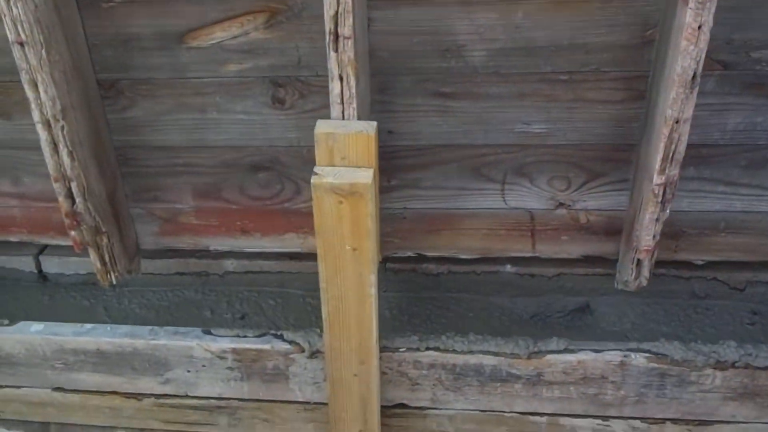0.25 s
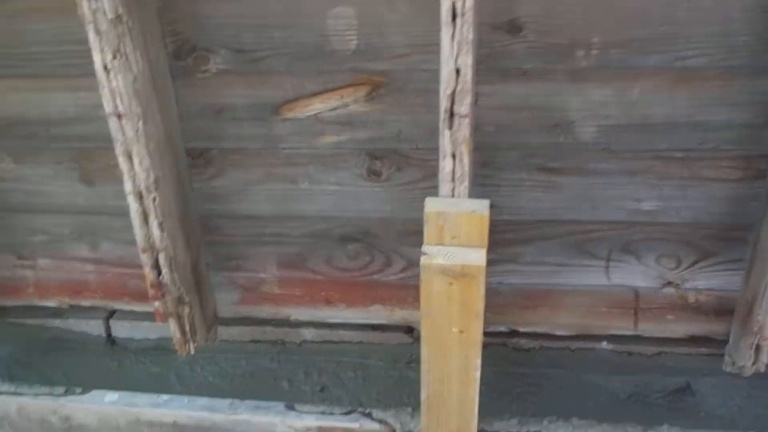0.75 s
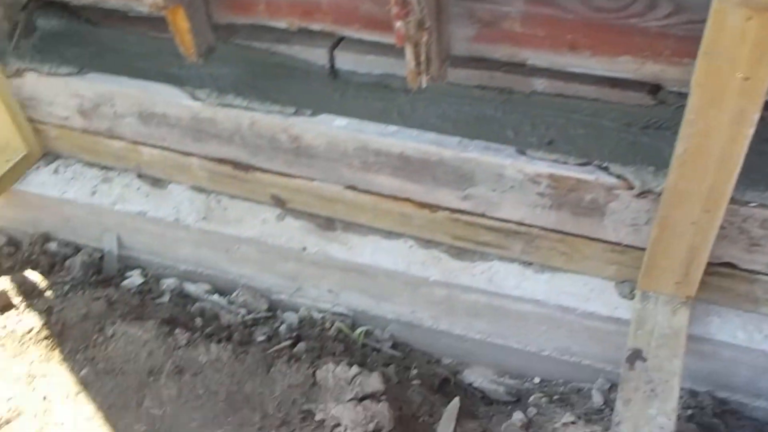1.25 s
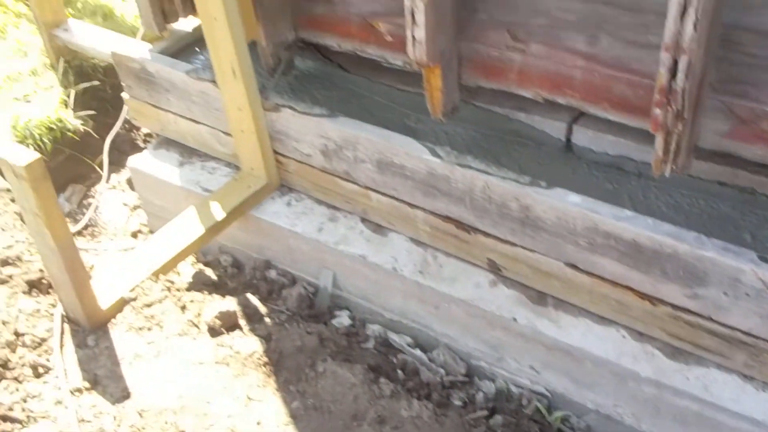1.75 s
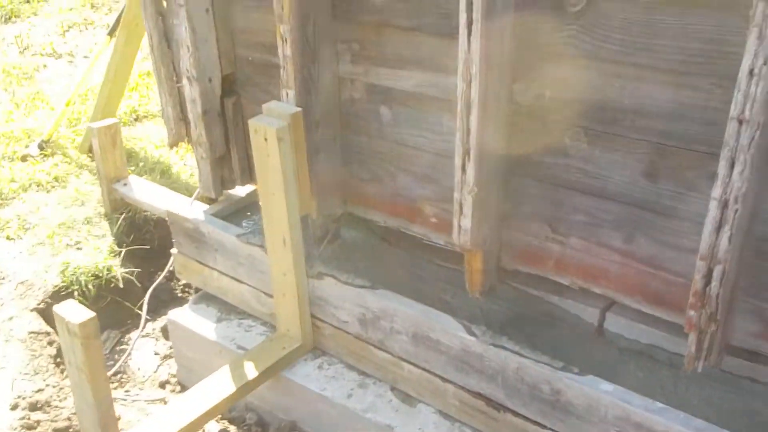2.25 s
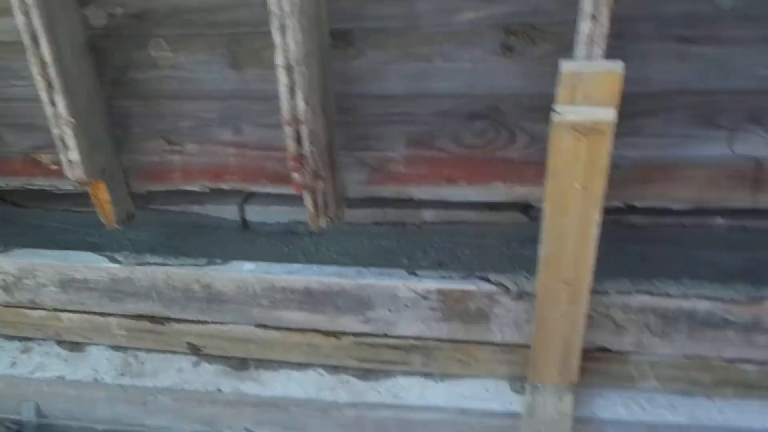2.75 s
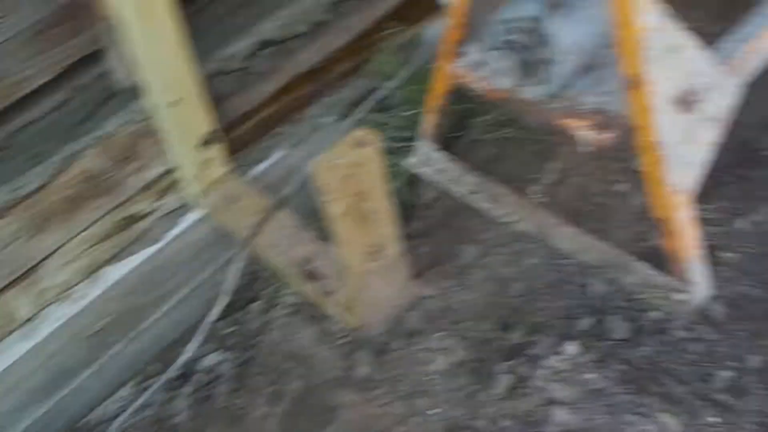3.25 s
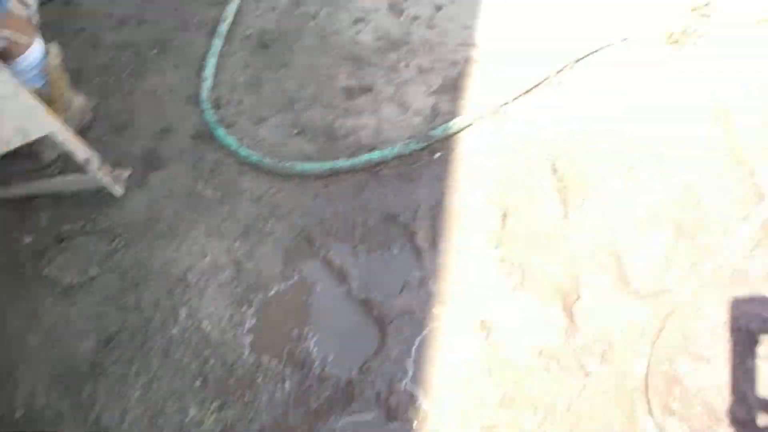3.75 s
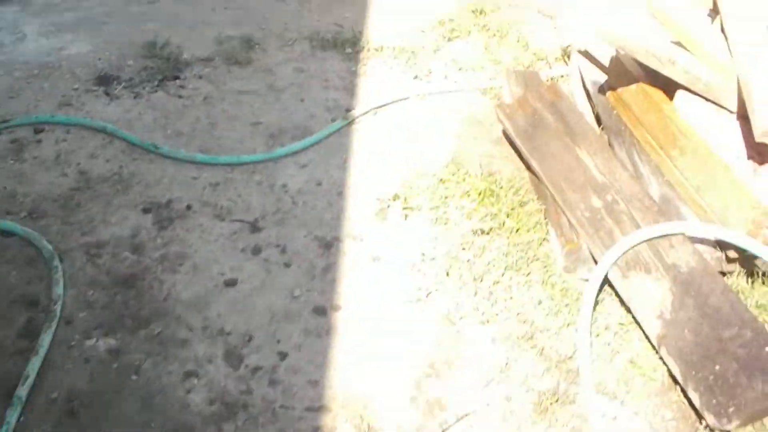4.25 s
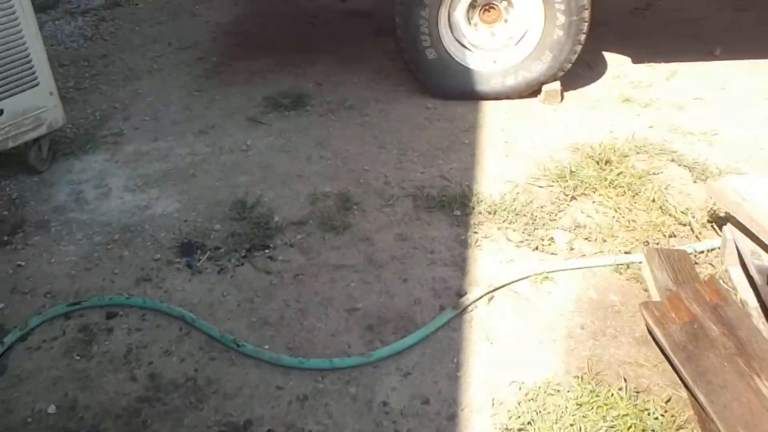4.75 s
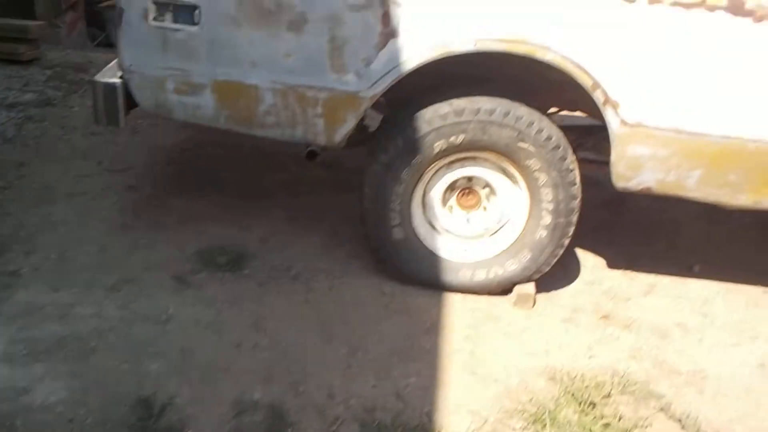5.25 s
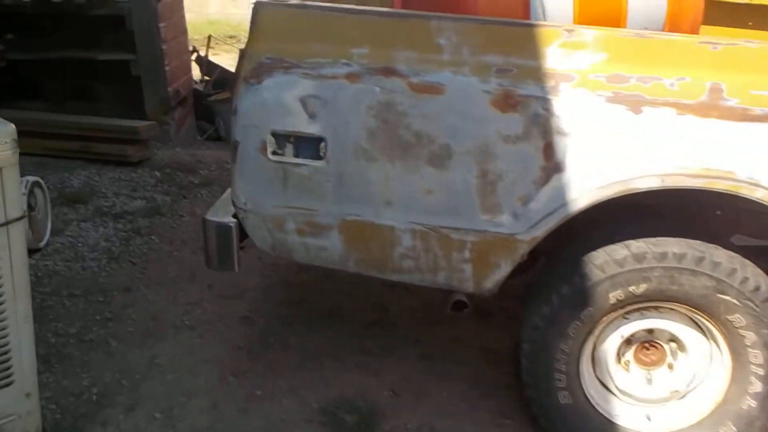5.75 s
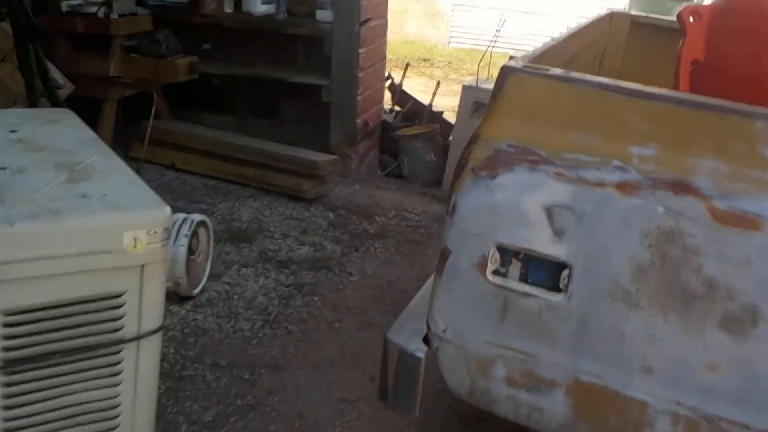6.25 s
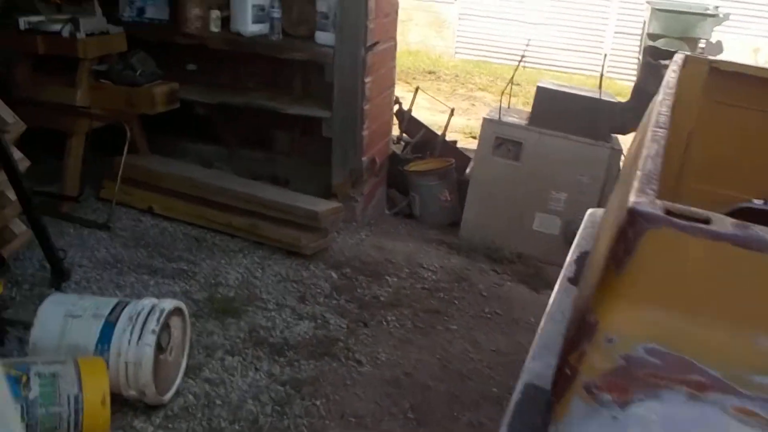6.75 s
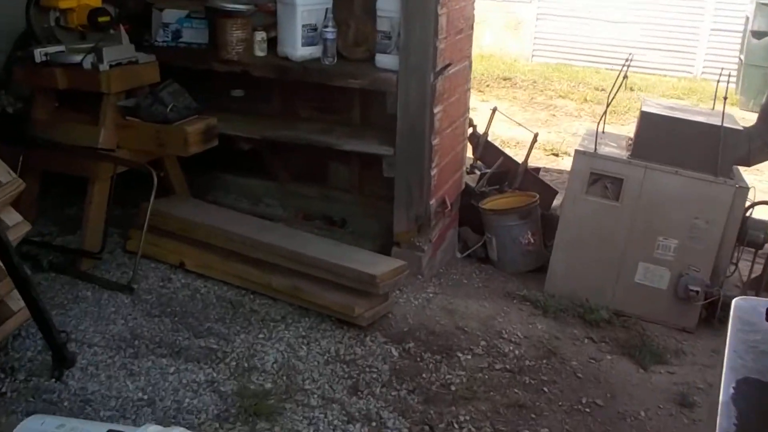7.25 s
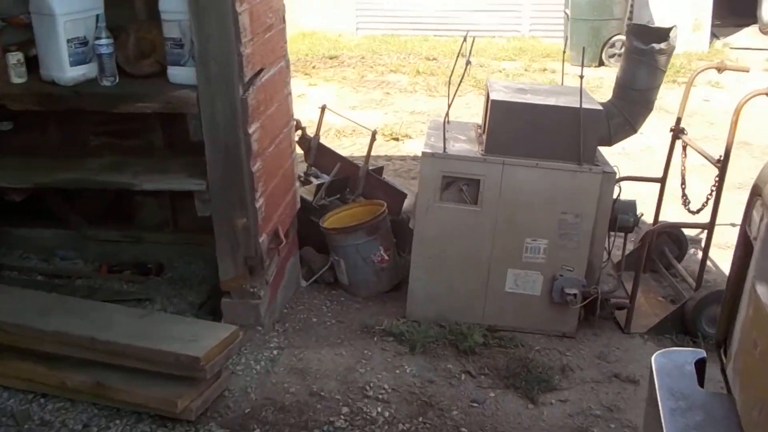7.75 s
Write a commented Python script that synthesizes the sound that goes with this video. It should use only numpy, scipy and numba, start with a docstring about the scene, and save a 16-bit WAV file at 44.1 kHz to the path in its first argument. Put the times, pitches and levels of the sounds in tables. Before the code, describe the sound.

Gritty churning and steel drum clatter pulse with fast gear teeth, wind puffs buffet the microphone, then the noise drops to gravel crunches and chirping.

```python
"""Beside a shed a small concrete mixer turns, heard by a hand-held camera that swings round and walks off.
Twice the lifted load crashes through the steel drum: noise and clicks, pulsed by gear teeth, ring its modes.
Bright noise makes the sliding mix, stones and scrapes; low noise on each port makes wind rumble and puffs.
Towards the end come small hollow knocks, gravel crunches of banded noise, a faint electrical hum and a bird
close by, whose chirps are drooping sines. A dull echo and hiss lie under it all."""
import sys
import numpy as np
from scipy import signal
from scipy.fft import rfft, irfft, next_fast_len
from scipy.io import wavfile
from scipy.ndimage import uniform_filter1d, map_coordinates
from numba import njit

SR = 44100
rng = np.random.default_rng(int(sys.argv[2]) if len(sys.argv) > 2 else 0)


def persist_wave(psi):
    """Save psi, clipped to +-1, as 16-bit WAV."""
    counts = np.round(np.clip(psi, -1, 1) * 32767).astype(np.int16)
    wavfile.write(sys.argv[1], SR, np.atleast_2d(counts).T)


N = 352800
TIME = np.arange(N) / SR
SIZE = next_fast_len(N + 8192)

# what struck steel at the gear rings with: (frequency [Hz], width [Hz], level in the clank [dB])
GEAR_MODES = [(980, 25, 4), (1796, 350, 17.5)]


def undb(db):
    """Amplitude of a level in dB."""
    return 10 ** (np.asarray(db) / 20)


def curve(table):
    """Columns of a table as signals, interpolated over its times."""
    s, *columns = np.transpose(table)
    return [np.interp(TIME, s, c) for c in columns]


def camera_response(size=SIZE):
    """Causal response of the microphones in their housing, from the cepstrum of the log gain."""
    # broad tone of the camera: (frequency [Hz], gain [dB])
    tone_curve = [(40, -66), (330, -13.5), (1030, -6), (1890, -8), (2180, -15.5), (2410, -27),
                  (2720, -31.5), (5360, -25), (7000, -26), (8090, -52), (11400, -42.5), (13100, -68)]
    # dips cut by the housing: (frequency [Hz], width [Hz], depth [dB])
    housing_dips = [(2412, 115, -17), (3035, 115, -15.5), (8090, 640, -14)]
    hz = np.maximum(np.fft.rfftfreq(8192, 1 / SR), 1)
    curve_hz, curve_db = np.array(tone_curve).T
    db = np.interp(np.log(hz), np.log(curve_hz), curve_db)
    db = db + sum(d * np.exp(-((hz - f) / w) ** 2) for f, w, d in housing_dips)
    cep = irfft(np.log(undb(np.maximum(db, -110))))
    # fold the cepstrum onto positive time: minimum phase
    cep[1:4096] *= 2
    cep[4097:] = 0
    return rfft(irfft(np.exp(rfft(cep))), size)


def mic_gain(hz):
    """Gain of the camera at one frequency."""
    return np.abs(camera_response()[int(hz * SIZE / SR)])


def heard(x, lo_hz, hi_hz, peak=False):
    """Scale so that the band has unit rms (or unit peak) behind the microphone."""
    size = next_fast_len(len(x) + 8192)
    hz = np.fft.rfftfreq(size, 1 / SR)
    in_band = (hz > lo_hz) & (hz < hi_hz)
    y = irfft(rfft(x, size) * camera_response(size) * in_band, size)[:len(x)]
    return x / (np.abs(y).max() if peak else y.std())


@njit
def svf(x, hz, width):
    """State-variable band-pass with a moving centre, gain 1 there."""
    y, b, l = np.empty(len(x)), 0., 0.
    for i in range(len(x)):
        g, k = np.tan(np.pi * hz[i] / SR), width / hz[i]
        v = (b + g * (x[i] - l)) / (1 + g * (g + k))
        b, l, y[i] = 2 * v - b, l + 2 * g * v, k * v
    return y


def band(x, hz, width_hz):
    """One resonance, at a fixed or moving frequency."""
    return svf(x, np.zeros(len(x)) + hz, 1. * width_hz)


def cut(x, hz, kind):
    """Fourth-order Butterworth filter."""
    return signal.sosfilt(signal.butter(4, hz, kind, fs=SR, output="sos"), x)


def walk(rate):
    """Random levels held 1 / rate s and slewed twice; spread near 1."""
    k = int(SR / rate)
    steps = np.repeat(rng.standard_normal(N // k + 1), k)
    return 1.93 * uniform_filter1d(uniform_filter1d(steps, k), k)[:N]


def grains(count, per_s, scatter_db):
    """Dense clicks of both signs, a few much larger than the rest."""
    struck = rng.random(count) < per_s / SR
    return struck * rng.standard_normal(count) * undb(scatter_db * rng.exponential(size=count))


def die_away(clicks, decay_s):
    """Give each click, made positive, an exponential fade."""
    return signal.lfilter([1], [1, -np.exp(-1 / (decay_s * SR))], np.abs(clicks))


def add(out, s, sound):
    """Lay a sound into the track at a time in seconds."""
    i = int(s * SR)
    out[..., i:i + sound.shape[-1]] += sound[..., :N - i]


def load():
    """Levels of drum, sliding mix and stones in dB: churn plus each crash with its attack, hold and fade."""
    # steady churn as the camera moves about: (time [s], drum level [dB], relative level of sliding mix [dB])
    churn = [(0.9, -61, -50), (1.2, -45, -55.5), (1.45, -29.5, -59.5), (1.62, -35.5, -55.5),
             (1.76, -45.5, -58), (2.07, -41, -57.5), (3.1, -30, -45), (3.48, -36.5, -42.5),
             (3.8, -29.5, -43), (4.4, -28, -39), (4.5, -31.5, -40), (4.65, -26.5, -36), (4.95, -33.5, -48),
             (5.3, -29.5, -38.5), (5.42, -34, -48.5), (5.9, -31.5, -45), (6.1, -39.5, -47.5),
             (6.45, -43.5, -50), (7.0, -49.5, -60), (7.3, -45, -55), (7.6, -51.5, -64), (8, -48.5, -61.5)]
    # the lifted load crashes through the drum: (start [s], end [s], drum level [dB],
    # relative level of sliding mix at start [dB], at end [dB], relative level of stone strikes [dB])
    crashes = [(-.2, 0.816, -18.5, -33.5, -50.5, -57), (2.07, 3.014, -20, -51.5, -40, -57.5)]
    attack_s, stones_late_s = 0.007, 0.097
    # after a crash ends: a quick drop, then a steady fade
    fall_db, fade_db_per_s, stones_fade_db_per_s = -5, 64, 906
    loose_stones_db = -38.5  # strikes between the crashes, against the sliding mix
    drum, slide = undb(curve(churn)) ** 2
    stones = slide * undb(loose_stones_db) ** 2
    for start, end, drum_db, first_db, last_db, stone_db in crashes:
        after = np.maximum(TIME - end, 0)
        on = np.clip((TIME - start) / attack_s, 0, 1)
        fade_db = fall_db * np.minimum(after / 0.048, 1) - fade_db_per_s * after
        slide_db = np.interp(TIME, [start, end], [first_db, last_db])
        drum = drum + (on * undb(drum_db + fade_db)) ** 2
        slide = slide + (on * undb(slide_db + fade_db)) ** 2
        stone_fade_db = stone_db - stones_fade_db_per_s * after
        stones = stones + (TIME > start + stones_late_s) * undb(stone_fade_db) ** 2
    return 10 * np.log10([drum, slide, stones])


def gear_teeth(rebound):
    """Each tooth of the ring gear hits, then rebounds half a period later, harder under a crashing load."""
    # ring gear speed: (time [s], average rate [teeth/s])
    tooth_rate = [(0, 40.7), (2.35, 40.9), (3.5, 41.8), (3.9, 40.3), (4.6, 39.5), (5.05, 39.5), (5.3, 40.2),
                  (5.65, 38.5), (6, 39.5)]
    shaft = 0.2 + np.cumsum(curve(tooth_rate)[0]) / SR
    turns = shaft + 0.015 * walk(25)
    tooth, phase = turns.astype(int), turns % 1
    size = rng.standard_normal((400, 3))[tooth].T  # each tooth's own hit, rebound and stone strength
    hit = undb(2.5 * size[0]) * np.exp(-phase / 0.26)
    bounce = undb(2.0 * size[1]) * np.exp(-((phase + .5) % 1) / 0.73)
    jolt = hit + rebound * bounce
    jolt = uniform_filter1d(jolt, size=90) / jolt.mean()
    contact = undb(1.9 * size[0]) * np.diff(tooth, prepend=0)
    loosen = undb(6.3 * size[2]) * np.exp(-phase / 0.08)
    return shaft, jolt, contact, loosen


def shell(x, weight=0.069):
    """The steel drum: broad radiation plus its damped modes; weight sets how strongly the low end sounds."""
    # modes of the drum: (frequency [Hz], width [Hz], relative level [dB])
    drum_modes = [(354, 97, -8.5), (735, 35, -4.5), (940, 31, -13), (1393, 1050, 3.5)]
    modes = sum(undb(db) * band(x, hz, w) for hz, w, db in drum_modes)
    ring = cut(x, 4140, "low") + undb(3) * modes
    return cut(ring, 450, "high") + weight * cut(ring, [130, 716], "band")


def drum_body(share, peak_hz, rebound, jolt, contact):
    """Tumbling lumps push the shell in time with the teeth; metal contacts clank and one mode sings."""
    lumps = undb(1.6 * walk(17))
    grit = rng.standard_normal(N) + 1.28 * grains(N, 1500, 1.8)
    push = (1 - share + share * jolt) * lumps * grit
    # the clean metal contact at the start of each tooth
    clank = 55 * share ** 2 * contact * undb(0.29 * walk(12.0))
    ring = sum(undb(db) * band(clank, hz, w) for hz, w, db in GEAR_MODES)
    # a narrow mode sings, wavering in pitch, most under a crashing load
    bell_hz = 1176 * (1 + 0.0036 * walk(4.96))
    bell = rebound ** 2 * undb(19) * band(push, bell_hz, 24)
    push = push + .5 * clank
    loudest = 2.2 * band(band(push, peak_hz, 400), peak_hz, 400)
    body = shell(push, .3 + .5 * rebound) + loudest
    return heard(body + ring + bell, 900, 2200)


def gear_hum(shaft):
    """Sines locked to multiples of the average tooth rate, each wandering in level."""
    # {multiple of the tooth rate: relative level [dB]}
    hum_levels = {2: -58, 7: -50.5, 9: -34.5}
    hum = 0
    for multiple, db in hum_levels.items():
        tone = heard(np.sin(2 * np.pi * multiple * shaft), 0, SR)
        hum = hum + undb(db + 2.9 * walk(7.2)) * tone
    return hum


def mix_and_stones(slide_db, stone_db, share, jolt, loosen):
    """Wet mix slides as flickering hiss; stones tick brightly: rows are direct sound, then each port alone."""
    flicker_db = 0.6 * walk(12) + 1.5 * walk(40)
    slide = undb(flicker_db) * (1 - .5 * share + .5 * share * jolt)
    # a tooth jolts stones loose; others strike at random; each random strike is a tick of a few ms
    strike = loosen + 1.07 * die_away(grains(N, 200, 1.05), 0.0014) + 0.097
    rows = []
    for slide_share, stone_share in ((0.57, 0.69), (0.59, 0.54), (0.4, 0.83)):
        sliding = heard(slide * cut(rng.standard_normal(N), [2400, 8200], "band"), 3200, 7000)
        tick = strike * rng.standard_normal(N)
        bright = cut(tick, 7460, "high") + 0.51 * cut(tick, 2100, "high") + 0.11 * tick
        stones = heard(bright, 11405, 14000)
        rows.append(slide_share * undb(slide_db) * sliding + stone_share * undb(stone_db) * stones)
    return rows


def mixer():
    """Load and gear teeth shake the drum, mix slides, stones strike: direct sound, then each port's own."""
    # (time [s], share of the drum sound that pulses with the teeth [0-1], loudest drum resonance [Hz])
    gear_grip = [(0, 0.2, 1250), (0.9, 0.34, 1240), (1.5, 0.34, 1705), (2.06, 0.33, 1306), (3.8, 0.4, 2030),
                 (4.3, 0.5, 1120), (5.3, 0.25, 1420), (5.42, 0.53, 990), (5.95, 0.49, 1230),
                 (6.2, 0.33, 1490), (8, 0.38, 990)]
    share, peak_hz = curve(gear_grip)
    share = np.clip(share, 0, 1)
    drum_db, slide_db, stone_db = load()
    rebound = np.clip((drum_db + 41.0) / 25, 0, 1)  # grows with the load
    shaft, jolt, contact, loosen = gear_teeth(rebound)
    body = drum_body(share, peak_hz, rebound, jolt, contact)
    rows = mix_and_stones(slide_db, stone_db, share, jolt, loosen)
    rows[0] = rows[0] + undb(drum_db) * (body + share / share.mean() * gear_hum(shaft))
    return np.array(rows)


def wind_and_thump():
    """Turbulence differs between the two ports: a low rumble and short puffs; one soft thump is made alike."""
    # wind rumble: (time [s], level [dB])
    rumble_level = [(0, -43.5), (2.9, -44), (3.15, -62), (4.5, -57.5), (4.65, -39.5), (5, -60),
                    (6.4, -59.5), (6.6, -76), (7.82, -66), (7.9, -52.5)]
    # wind puffs, and at 5.518 s one low soft thump that is not wind:
    # (time [s], peak midway between the ports [dB], centre [Hz], left minus right [dB])
    puffs_and_thump = [(0.949, -21.5, 480, 15), (1.008, -25.5, 517, 15.5), (1.066, -26, 520, 15),
                       (1.119, -31.5, 460, 18), (1.315, -23, 546, 15), (1.447, -18.5, 460, 13.5),
                       (1.507, -23.5, 604, 20), (1.611, -25.5, 465, 9), (1.647, -27, 606, 2),
                       (1.697, -19, 640, 7.5), (1.767, -28.5, 463, 17), (1.857, -16, 690, 11),
                       (1.916, -19.5, 530, 4), (1.975, -29, 507, 4), (2.02, -24, 550, 7),
                       (4.696, -32, 398, 12), (5.518, -38, 200, 0), (7.63, -50, 250, -8),
                       (7.85, -46, 203, -12), (7.933, -32.5, 222, -9), (7.975, -28, 296, -3)]
    rumble = [undb(2.47 * walk(14)) * cut(n, 370, "low") for n in rng.standard_normal((2, N))]
    out = undb(curve(rumble_level)[0]) * np.array([heard(r, 100, 620) for r in rumble])
    t = TIME[:5000]
    for s, db, hz, pan_db in puffs_and_thump:
        length_s = .038 if hz > 305 else .012  # the deepest ones are brief thumps
        swell = np.minimum(t / 0.00028, 1) * np.clip((length_s - t) / 0.0052, 0, 1)
        # starts with a pop, then flutters
        flutter = die_away(grains(len(t), 180, 0.55), 0.00073)
        swell = swell * (0.86 + 0.76 * np.exp(-t / 0.0065) + flutter)
        same, own = rng.standard_normal(len(t)), rng.standard_normal((2, len(t)))
        for k, sign in enumerate((1, -1)):
            low_noise = swell * (same + own[k])
            low_noise = band(band(low_noise, hz, 0.38 * hz), hz, 2 * hz)
            add(out[k], s, undb(db + sign * pan_db / 2) * heard(low_noise, 85, 966, peak=True))
    return out


def hiss():
    """Steady bright noise, separate on each port."""
    noise = [cut(rng.standard_normal(N), 8200, "high") for _ in range(2)]
    return undb(-75) * np.array([heard(n, 9000, 12500) for n in noise])


def echo(near):
    """Shed wall and ground return a short dull tail, different at each port."""
    t = TIME[:7000]
    fade = np.exp(-np.log(1000) * t / 0.12) * (t > .003)
    tails = rng.standard_normal((2, len(t))) * fade
    tails = tails / np.sqrt((tails ** 2).sum(1))[:, None]
    scatter = signal.fftconvolve(cut(near, 2200, "low")[None], tails, axes=1)
    return undb(-11.0) * scatter[:, :N]


def scrapes():
    """Grit drags briefly over steel: a gritty hiss that starts sharply and dies."""
    # short bright scrapes: (time [s], peak [dB], centre [Hz])
    scrape_list = [(0.389, -21, 5000), (1.305, -34.5, 4400), (1.385, -36.5, 5200), (2.857, -26.5, 5200),
                   (3.531, -33.5, 4200), (4.62, -26, 5200), (5.786, -35, 5900), (5.859, -34, 5200),
                   (6.31, -35, 3600)]
    out, t = np.zeros(N), TIME[:5000]
    for s, db, hz in scrape_list:
        grit = (rng.standard_normal(len(t)) + grains(len(t), 1200, 3)) * np.exp(-(t / 0.03) ** 2)
        add(out, s, undb(db) * heard(band(grit, hz, 0.79 * hz), 2400, 7500, peak=True))
    return out


def hard_hits():
    """A lump or a gear tooth hits hard: a short noisy push rings the drum, with a crack on top."""
    # hard hits in the drum: (time [s], peak of the body [dB], treble minus body [dB])
    hit_list = [(0.811, -9, -34), (1.249, -15, -25), (1.555, -20, -23), (2.084, -10, -19.5),
                (2.207, -10.5, -14), (2.508, -12, -21), (2.519, -6.5, -22), (3.156, -16.5, -12.5),
                (3.675, -17.5, -25), (4.547, -20.5, -33), (4.725, -17.5, -14.5), (5.154, -19, -11),
                (5.203, -17, -7.5), (5.3, -15.5, -21), (5.506, -17, -30), (5.691, -16, -36),
                (5.713, -12, -41), (5.916, -17.5, -32), (6.171, -22.5, -27)]
    out, t = np.zeros(N), TIME[:6000]
    for s, db, treble_db in hit_list:
        push = rng.standard_normal(len(t)) * np.exp(-t / 0.013) * np.minimum(t / 0.00052, 1)
        crack = cut(push * np.exp(-t / 0.038), 2880, "high")
        body = shell(push) + sum(2 * band(push, hz, w) for hz, w, _ in GEAR_MODES)
        body = heard(body, 700, 2200, peak=True)
        treble = undb(treble_db) * heard(crack, 3200, 7000, peak=True)
        add(out, s, undb(db) * (body + treble))
    return out


def ticks():
    """A lone stone clicks on the steel: a few ms of bright noise."""
    # (time [s], peak [dB])
    tick_list = [(4.2202, -43), (5.218, -35)]
    out, t = np.zeros(N), TIME[:900]
    for s, db in tick_list:
        click = rng.standard_normal(len(t)) * np.exp(-t / 0.0016)
        add(out, s, undb(db) * heard(cut(click, 9100, "high"), 9300, 11300, peak=True))
    return out


def knocks():
    """A hollow object is knocked: a few ms of noise rings three damped modes."""
    # (time [s], peak [dB], extra level of the lowest mode [dB])
    knock_list = [(5.205, -25, 12), (6.482, -16.5, -5.5), (6.584, -21, 8), (6.915, -18.5, 3)]
    # modes of the object, lowest first: (frequency [Hz], relative level [dB], fade t60 [s])
    hollow_modes = [(435, -4.5, 0.03), (1920, -6, 0.012), (4560, -14, 0.005)]
    out, t = np.zeros(N), TIME[:9000]
    for s, db, low_db in knock_list:
        push = rng.standard_normal(len(t)) * np.exp(-t / 0.0033) * np.minimum(t / 0.0016, 1)
        ring = 0
        for hz, mode_db, t60 in hollow_modes:
            lift_db = low_db * (hz == hollow_modes[0][0])
            ring = ring + undb(mode_db + lift_db) / mic_gain(hz) * band(push, hz, 2.2 / t60)
        add(out, s, undb(db) * heard(ring + 0.53 * push, 260, 6200, peak=True))
    return out


def gravel():
    """Gravel crunches: fading noise and clicks in a band that slides down, over a dull wash."""
    # (time [s], peak [dB], centre at the start [Hz], fade t60 of the grit [s])
    crunch_list = [(6.124, -24, 1440, 0.34), (6.297, -32.5, 784, 0.31), (6.773, -27, 1100, 0.23),
                   (7.082, -30.5, 1230, 0.2), (7.183, -23.5, 1070, 0.28), (7.253, -29.5, 1060, 0.19),
                   (7.364, -33.5, 720, 0.32), (7.41, -22, 980, 0.0082), (7.701, -35, 1470, 0.27),
                   (7.746, -31, 806, 0.023)]
    out, t = np.zeros(N), TIME[:9000]
    for s, db, hz, t60 in crunch_list:
        grit = (rng.standard_normal(len(t)) + grains(len(t), 1200, 3)) * np.exp(-np.log(1000) * t / t60)
        attack = np.minimum(t / (0.016 * t60), 1)
        crunch = band(grit, hz * (1 - 1.6 * t), 190) * attack + 0.21 * cut(grit, 3300, "low")
        add(out, s, undb(db) * heard(crunch, 560, 2400, peak=True))
    return out


def electrical_hum():
    """A faint steady electrical hum by the shed: one sine that fades in."""
    # (start [s], frequency [Hz], level [dB])
    hum_setting = (6.4, 118.4, -89)
    s, hz, db = hum_setting
    return undb(db) * np.clip((TIME - s) / 0.17, 0, 1) * heard(np.sin(2 * np.pi * hz * TIME), 0, SR)


def bird():
    """Chirps: short sines with a 90 Hz tremolo, drooping in pitch at the end."""
    # (time [s], pitch at the start [Hz], level before tremolo [dB])
    chirp_list = [(7.03, 4330, -62), (7.11, 4460, -61), (7.578, 4400, -58), (7.86, 4400, -50.5)]
    out, t = np.zeros(N), TIME[TIME < .032]
    for s, hz, db in chirp_list:
        swell = np.sin(np.pi * t / t[-1])
        tremolo = 1 + 0.43 * np.sin(2 * np.pi * 90 * t + 2 * np.pi * rng.random())
        tone = swell * tremolo * np.sin(2 * np.pi * hz * t * (1 - 8 * t ** 2))
        add(out, s, undb(db) * tone / mic_gain(hz))
    return out


def two_ports(near):
    """The two ports hear the sound a few samples apart at most, by the way the camera points."""
    # the camera turns: (time [s], lag of the left port [samples])
    bearing = [(3, 0.84), (3.8, -1), (6.3, -1.52), (6.8, -0.2)]
    lag, = curve(bearing)
    return np.array([map_coordinates(near, [np.arange(N) - sign * lag / 2], order=3) for sign in (1, -1)])


def scene():
    """Sum the sources, place them at the two ports and add echo, wind and hiss."""
    direct, *own = mixer()
    near = direct + scrapes() + hard_hits() + ticks() + knocks() + gravel() + electrical_hum() + bird()
    mix = two_ports(near) + np.array(own) + echo(near) + wind_and_thump() + hiss()
    # the hand shades the left port's top octave
    shade = 0.068
    mix[0] = np.convolve(mix[0], [shade, 1 - 2 * shade, shade], "same")
    return mix


def record(dry):
    """The camera housing colours the sound, the loudest peaks are rounded and the top is cut."""
    coloured = irfft(rfft(dry, SIZE) * camera_response(), SIZE)[:, :N]
    rounded = np.tanh(coloured)
    return signal.sosfilt(signal.ellip(8, .2, 60, 13300, fs=SR, output="sos"), rounded)


dry = scene()
out = record(dry)
persist_wave(out)
```